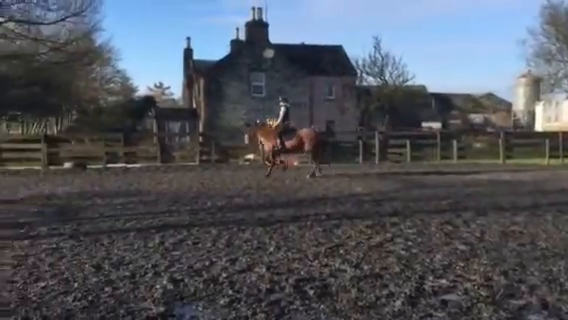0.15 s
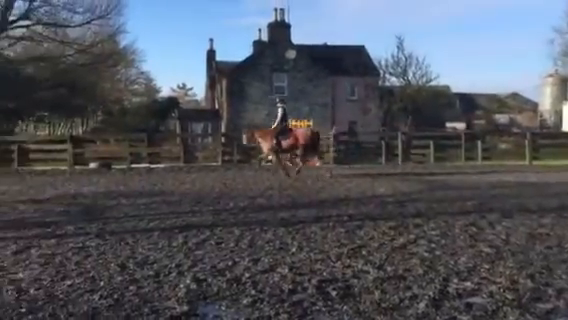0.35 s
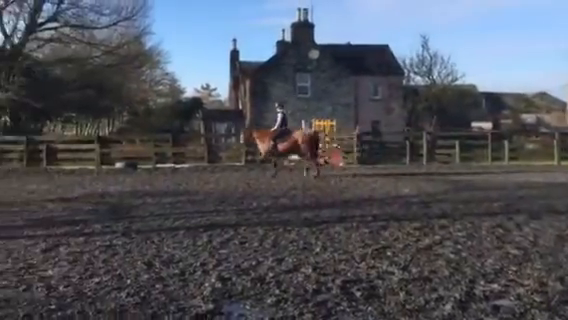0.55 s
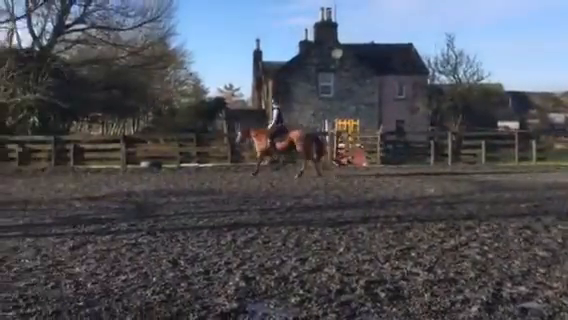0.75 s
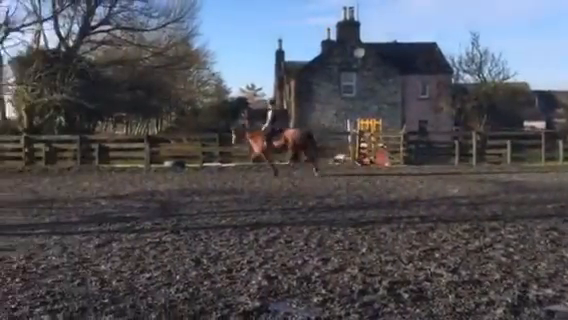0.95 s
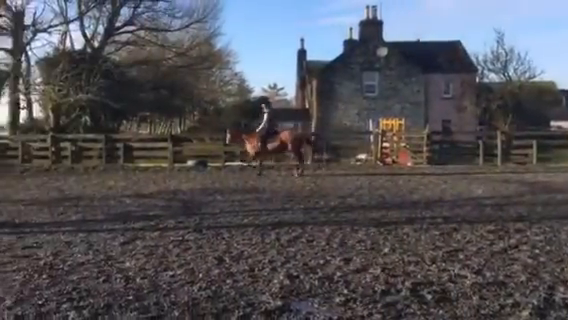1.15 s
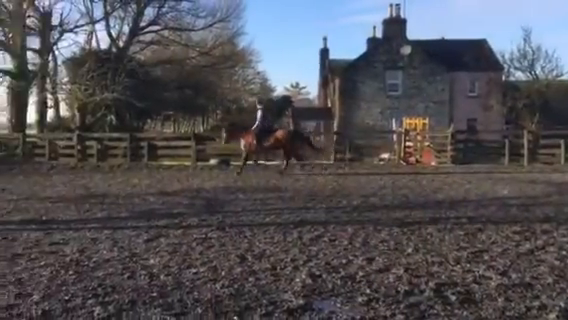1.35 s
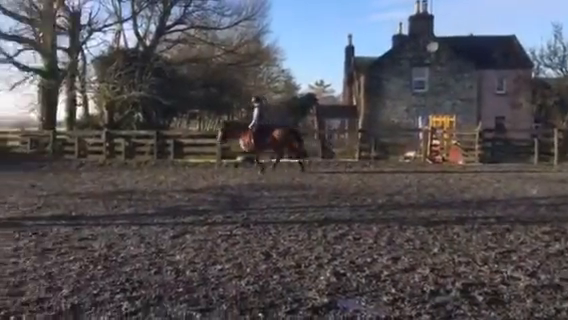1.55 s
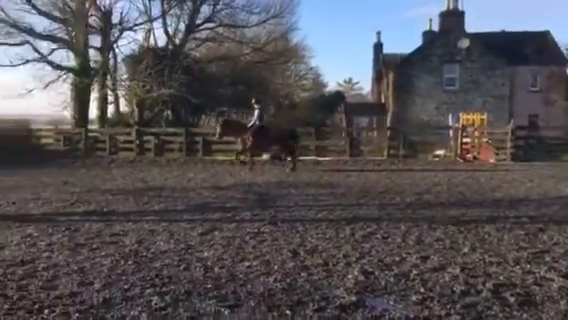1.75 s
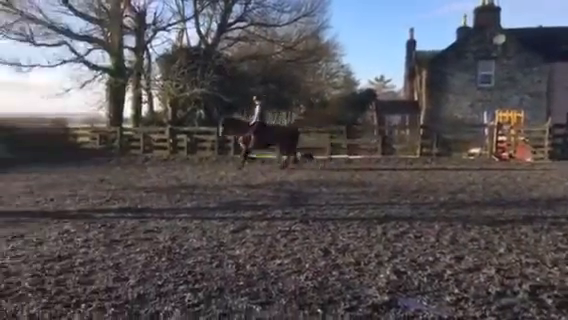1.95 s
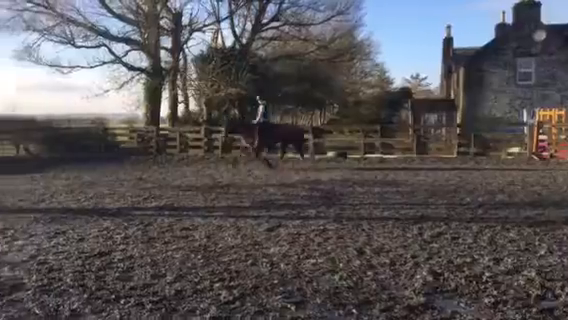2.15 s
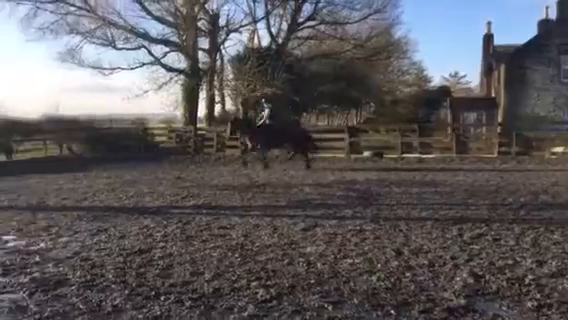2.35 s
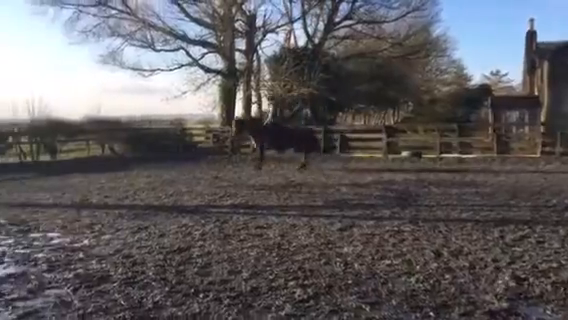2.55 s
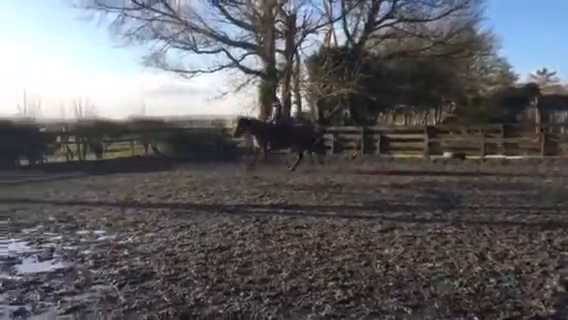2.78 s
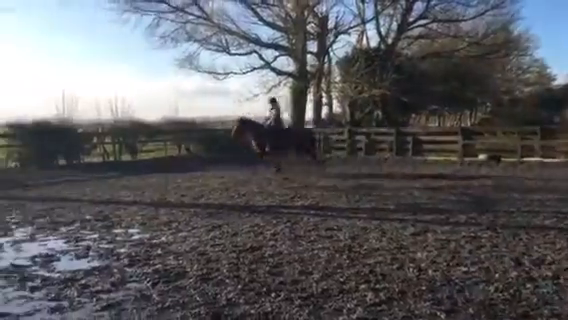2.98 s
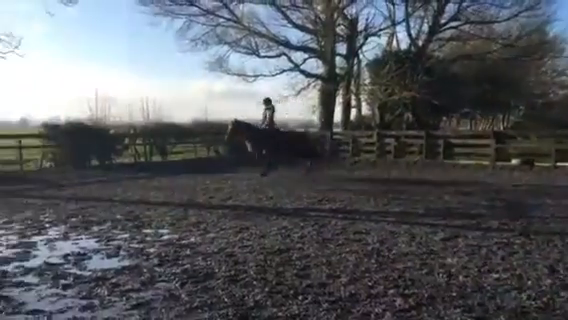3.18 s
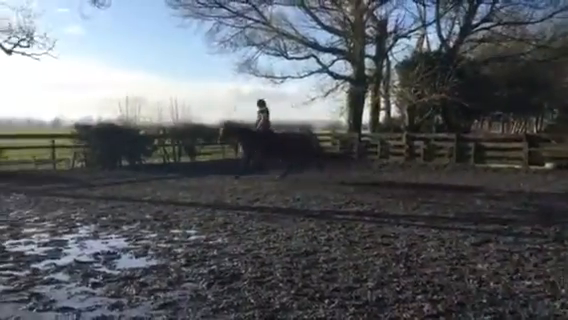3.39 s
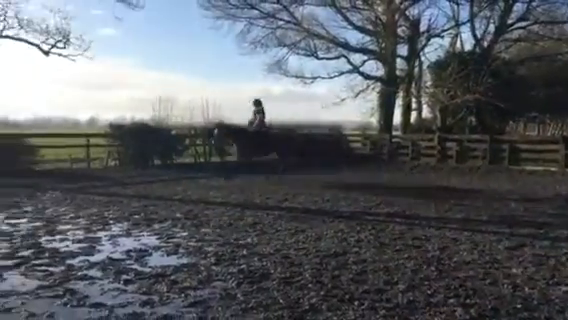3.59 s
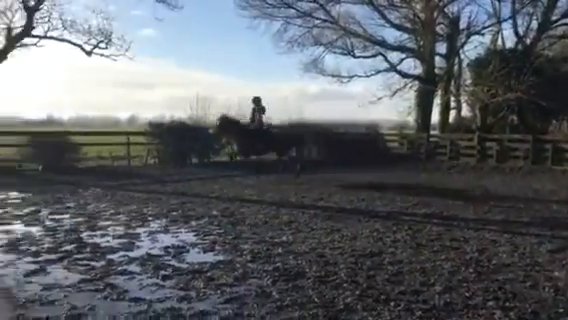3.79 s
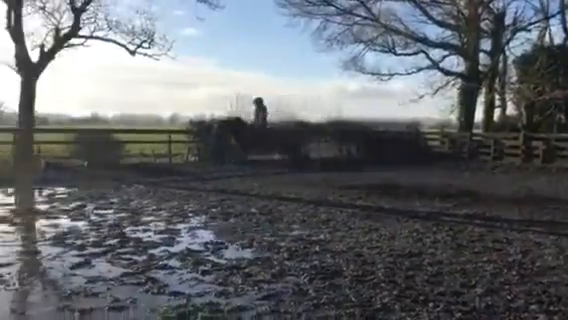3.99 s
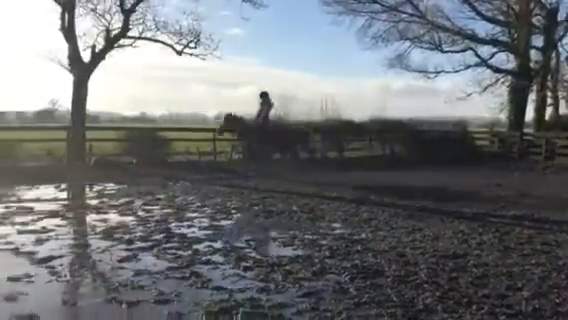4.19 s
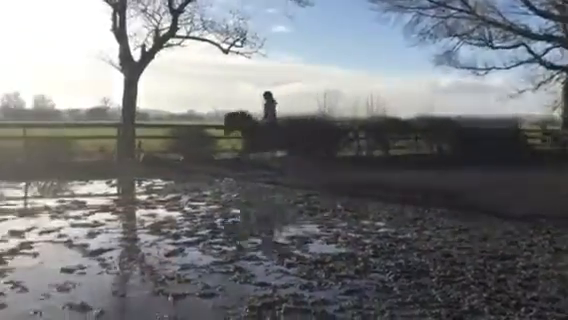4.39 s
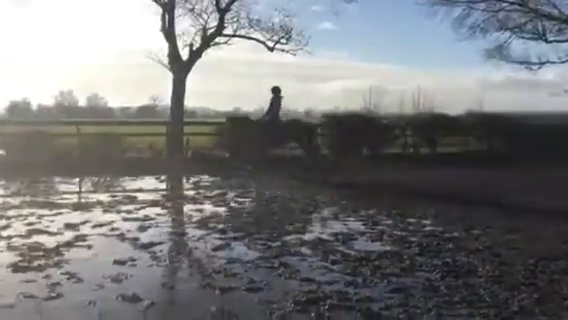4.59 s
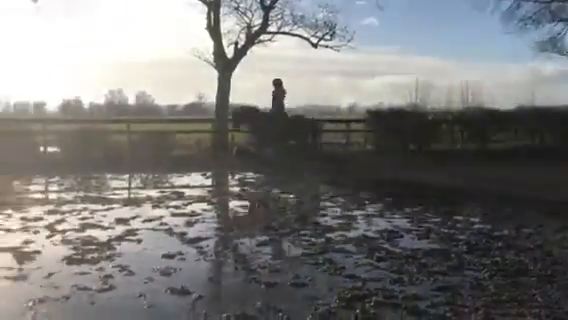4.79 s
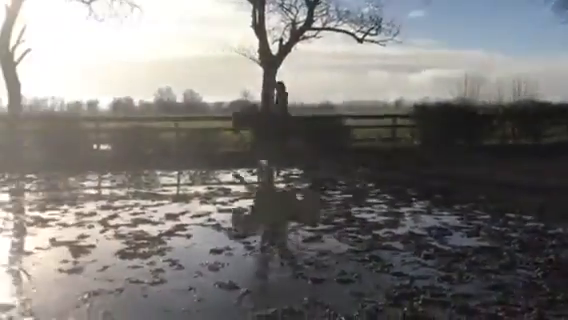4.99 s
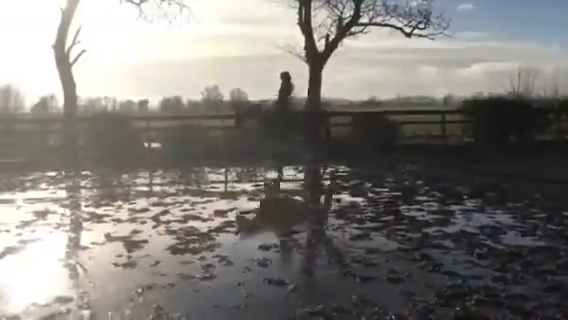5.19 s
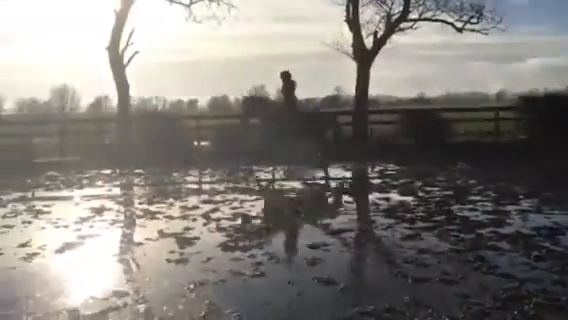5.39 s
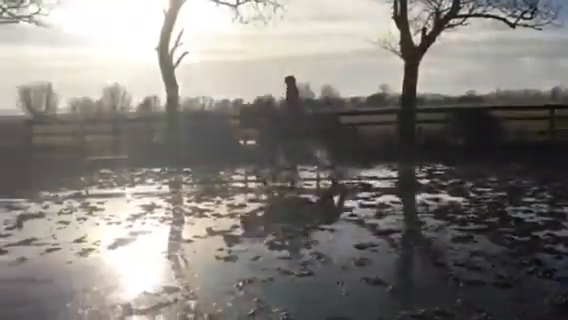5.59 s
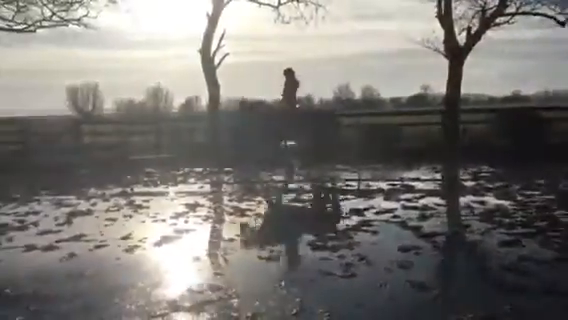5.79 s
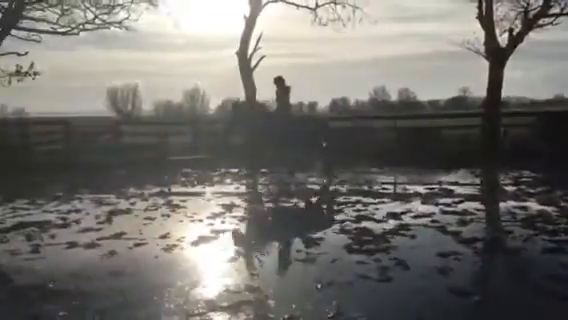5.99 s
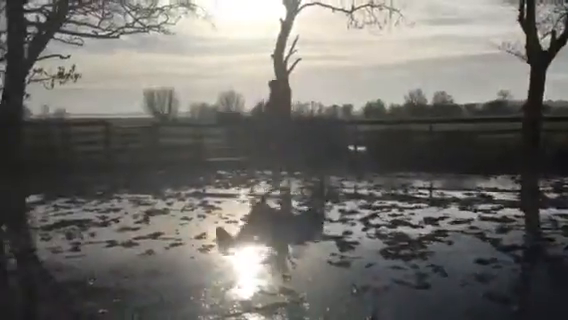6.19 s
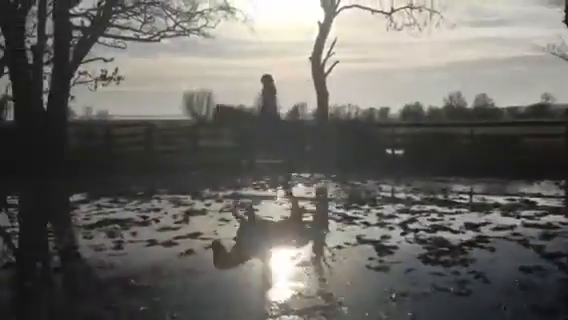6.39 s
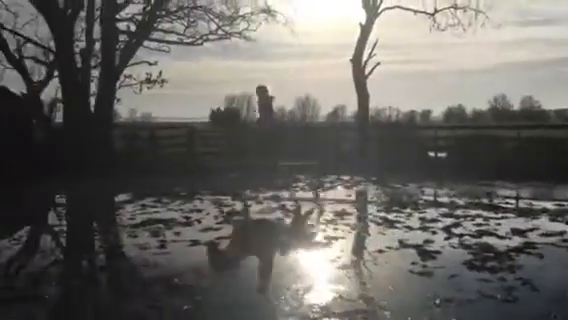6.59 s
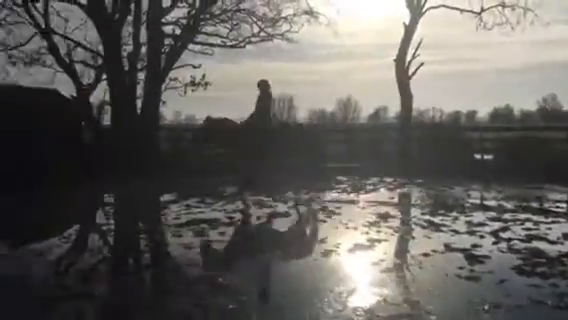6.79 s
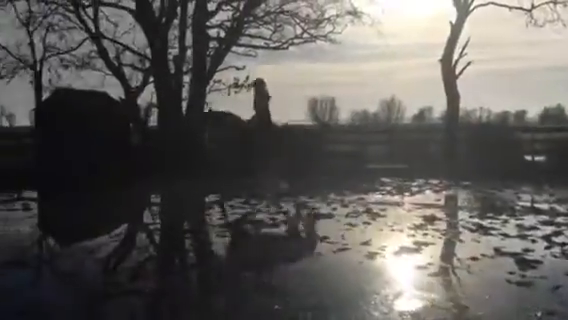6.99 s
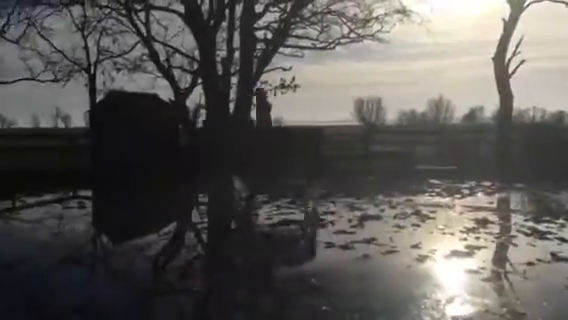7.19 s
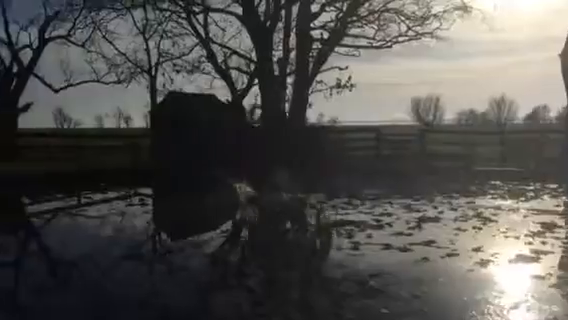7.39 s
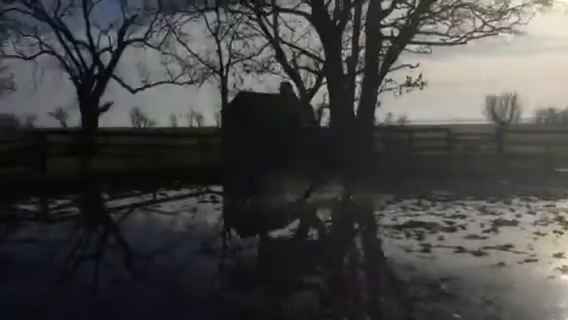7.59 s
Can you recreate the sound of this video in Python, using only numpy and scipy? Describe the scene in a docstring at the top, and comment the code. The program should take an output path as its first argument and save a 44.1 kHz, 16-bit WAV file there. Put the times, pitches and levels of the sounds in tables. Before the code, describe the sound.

A horse canters in an arc over wet ground, starting far away and barely audible above soft air and rumble. After a distant boom and sparse bird calls, mud squelches become clearer, with sharp spits of water and brief faint tack buzzes. From about five seconds hooves knock loudly, mud pockets smack and water sprays, peaking in close, heavy thuds just after seven seconds. Open-air, slightly dull echoes, small microphone.

```python
"""A faint rumble lies under everything; soft squelches, hoarse bird calls and one dull boom come early.
Thin whistles follow, as a horse canters round a waterlogged arena, from the far mud into puddles close by.
Each hoof shuts an air pocket with a thud that falls in pitch; mud is filtered random clicks and ringing bubbles.
Spray is a fizz of fine clicks that patters back down, with sharp spits and pitched drops of water.
Metal tack buzzes now and then; the surroundings add dull echoes to hooves and mud."""
import sys
import numpy as np
from scipy import signal
from scipy.fft import rfft, irfft, next_fast_len
from scipy.io import wavfile

SR = 44100
rng = np.random.default_rng(int(sys.argv[2]) if len(sys.argv) > 2 else 0)


def master_out(mix):
    """Clip the mix to full scale and print it as 16-bit PCM to the path in sys.argv[1]."""
    frames = np.transpose(np.atleast_2d(mix))
    ceiling = np.clip(frames, -1, 1)
    pcm = np.round(ceiling * 32767).astype(np.int16)
    wavfile.write(sys.argv[1], SR, pcm)


N = 337365
TIME = np.arange(N) / SR

# churned water that keeps stirring as the horse comes near: (time [s], relative level [dB])
WASH = [(0, -69.5), (1.2, -69.5), (2.9, -65.5), (4.3, -65), (5.2, -60.5), (6.2, -60), (6.9, -64.5),
        (7.65, -56)]
# a hoof lands, thuds and throws a splash; levels are relative within each layer, swell counts to the thud's crest:
# (time [s], thud level [dB], starting pitch [Hz], swell [cycles at starting pitch],
#  squelch level [dB], spray level [dB], bubble pitch [Hz])
STRIKES = [(0.158, -51.5, 360, 1.6, -55, -63, 1200), (0.2055, -50.5, 346, 2.1, -55, -50.5, 1530),
           (1.1811, -36, 650, 0.91, -65, -67, 1240), (1.4675, -48, 533, 1.7, -63, -71, 870),
           (2.041, -45, 335, 1.2, -59, -62, 1250), (3.176, -43.5, 374, 1.4, -50.5, -52, 1100),
           (3.501, -34, 990, 3.5, -60, -57, 965), (3.532, -45.5, 770, 3.4, -88, -74, 1250),
           (3.719, -40, 516, 1.3, -55.5, -52, 1170), (4.0354, -36.0, 760, 1.1, -55, -73, 1910),
           (4.1732, -47, 340, 1.9, -51.5, -55, 810), (4.3594, -38.5, 1790, 1.8, -74, -56, 1590),
           (4.5089, -31.5, 2200, 2.6, -45, -49.5, 1560), (4.6439, -34, 686, 1.33, -43, -52, 1530),
           (5.0127, -19.5, 1807, 1.97, -34, -44.5, 870), (5.1531, -29, 584, 1.02, -39, -46, 3080),
           (5.5447, -20, 2150, 1.23, -37.5, -37, 1540), (5.5732, -22, 460, 1.13, -36.5, -53, 1220),
           (5.695, -34, 456, 1.05, -41, -49, 1830), (6.0836, -37, 530, 1.3, -41, -37, 3730),
           (6.119, -30.5, 570, 0.98, -36.5, -42.5, 1820), (6.231, -32.5, 400, 1, -39, -44, 3100),
           (6.633, -35, 496, 0.64, -41, -41.5, 1600), (6.8094, -34, 1644, 0.78, -45, -51, 1630),
           (7.1723, -16.5, 480, 0.67, -40, -41, 820), (7.177, -13, 1020, 0.47, -33.5, -50, 1820),
           (7.3695, -15.5, 640, 0.85, -34, -41, 1930), (7.5745, -40, 1660, 2.7, -33.5, -38.5, 2330)]


def from_db(db):
    """Amplitude ratio of a level: 20 dB for each factor of ten."""
    return 10 ** (np.asarray(db) / 20)


def rms_one(x):
    """Normalises the mean power to one."""
    return x / np.sqrt(np.mean(x ** 2) + 1e-20)


def at_hz(points, hz):
    """Interpolates a spectrum in dB along logarithmic frequency."""
    points = np.array(points)
    return np.interp(np.log(hz), np.log(points[:, 0]), points[:, 1])


def band(x, low_hz, high_hz):
    """Band-pass filtering by a Butterworth response."""
    sos = signal.butter(2, [low_hz, min(high_hz, .45 * SR)], "band", fs=SR, output="sos")
    return signal.sosfilt(sos, x + 1e-18)


def bell(x, hz, db, q):
    """Resonance: adding a scaled narrow band lifts or lowers it."""
    return x + (from_db(db) - 1) * signal.lfilter(*signal.iirpeak(hz, max(q, .5), fs=SR), x)


def noise():
    """White noise: equal mean power at every frequency."""
    return rng.standard_normal(N)


def steady_noise(colour):
    """Spectral shaping of white noise to the given colour, with rms 1."""
    size = next_fast_len(N)
    hz = np.maximum(np.fft.rfftfreq(size, 1 / SR), 1)
    gain = from_db(at_hz(colour, hz)) * np.minimum(hz / colour[0][0], 1)
    return rms_one(irfft(rfft(rng.standard_normal(size)) * gain, size)[:N])


def drops(per_s, spread_db):
    """Shot noise: independent random clicks of uneven size and either sign, with rms 1."""
    chance = rng.random(N)
    at = np.flatnonzero(chance < per_s / SR)
    rarity = -np.log(chance[at] * SR / per_s + 1e-9)
    signs = 2 * rng.integers(0, 2, len(at)) - 1
    clicks = np.zeros(N)
    clicks[at] = from_db(spread_db * np.minimum(rarity, 4)) * signs
    return rms_one(clicks)


def sputter(rate_hz, depth_db):
    """Random amplitude modulation: low-passed noise gives uneven surges, a gain of rms 1."""
    steps = TIME[::20]
    keep = np.exp(-2 * np.pi * rate_hz * steps[1])
    gushes = rms_one(signal.lfilter([1], [1, -2 * keep, keep * keep], rng.standard_normal(len(steps))))
    return np.interp(TIME, steps, rms_one(from_db(depth_db * np.clip(gushes, -2, 2))))


def bank(colour, excite):
    """Third-octave filtering: bands with separate calls of excite, together of rms 1: (centres, bands)."""
    edges = 22 * 2 ** (np.arange(30) / 3)
    edges = edges[edges > colour[0][0] * .7]
    centres = np.sqrt(edges[1:] * edges[:-1])
    bands = np.array([from_db(at_hz(colour, hz)) * band(excite(), low, high)
                      for hz, low, high in zip(centres, edges, edges[1:])])
    return centres, bands / np.sqrt(np.mean(bands.sum(axis=0) ** 2))


def burst(s, rise, decay, patter_db, patter_s):
    """Two-stage decay: a splash swells, collapses and leaves falling drops: (samples, envelope)."""
    span = slice(max(0, int((s - .1) * SR)), min(N, int((s + .4) * SR)))
    age = TIME[span] - s
    after = np.maximum(age, 0)
    collapse = np.exp(-after / max(decay, .001))
    patter = from_db(patter_db) * np.exp(-after / patter_s)
    swell = np.exp(-(np.minimum(age, 0) / max(rise, .0005)) ** 2)
    return span, np.hypot(collapse, patter) * swell


def rising_note(hz, age, life, glide):
    """Frequency modulation: the phase runs ahead as the note ages, so the pitch rises."""
    return np.sin(2 * np.pi * hz * age * (1 + glide * np.minimum(life, 2)))


def wash_level(times):
    """Linear interpolation in dB of the churned water's relative level."""
    return np.interp(times, *np.transpose(WASH))


def air():
    """Broadband ambience: steady coloured noise of the open air."""
    # spectrum of the air: (frequency [Hz], relative spectral level [dB])
    air_colour = [(30, -37), (60, 6), (110, 0), (200, -6.5), (400, -14), (700, -22), (1000, -19.5),
                  (2000, -29.5), (3300, -34.5), (5000, -49), (9000, -51), (11000, -71), (16000, -41)]
    return from_db(-57) * steady_noise(air_colour)


def rumble():
    """Low-frequency ambience: coloured noise wanders in level about one mean."""
    # spectrum of the rumble: (frequency [Hz], relative spectral level [dB])
    rumble_colour = [(25, 7), (40, -2), (55, 8), (80, -16), (100, 10.5), (130, -24.5), (250, -17.5),
                     (600, -62)]
    return from_db(-57) * sputter(rate_hz=5, depth_db=5.5) * steady_noise(rumble_colour)


def boom(s, start_hz, hz, db, decay, tail_db, roll_db):
    """Decaying oscillation: one dull, distant boom sinks in pitch, with a low tail and a fluttering roll."""
    tail_decay_s = .1
    age = np.maximum(TIME - s, 0)
    pitch = hz + (start_hz - hz) * np.exp(-age / 0.0097)
    phase = 2 * np.pi * np.cumsum(pitch * (age > 0)) / SR
    note = np.exp(-(age / decay) ** 2) * np.sin(phase)
    fade = np.exp(-age / tail_decay_s)
    tail = rms_one(band(noise(), 66, 120)) * fade
    roll = rms_one(band(noise(), 170, 340)) * sputter(rate_hz=45, depth_db=4) * fade
    onset = 1 - np.exp(-age / 0.0011)
    return onset * (from_db(db) * note + from_db(tail_db) * tail + from_db(roll_db) * roll)


def birds():
    """Frequency-swept tones make thin, wavering whistles; narrow noise bands make hoarse calls."""
    # thin whistles: (time [s], length [s], start pitch [Hz], end pitch [Hz], level [dB])
    whistles = [(3.592, 0.036, 4330, 6100, -63), (3.797, 0.053, 4400, 4830, -61),
                (3.893, .05, 6000, 6450, -59), (3.819, 0.13, 2260, 3400, -62),
                (4.073, 0.042, 3820, 3700, -58), (4.363, 0.032, 4030, 4600, -57),]
    # hoarse far-off calls, blurred by distance, half width taken at half amplitude:
    # (crest time [s], half width [s], pitch [Hz], level [dB], octave above re pitch band [dB])
    far_calls = [(0.066, 0.018, 1800, -65, -4), (0.548, 0.033, 660, -62.5, -20),
                 (1.395, 0.022, 2270, -67.5, -10), (1.74, .016, 2650, -63, -12),
                 (1.833, 0.13, 695, -68, -20), (3.394, .025, 3460, -70, -20),
                 (3.585, 0.011, 1350, -63, -20), (4.232, 0.036, 650, -58, -15)]
    out = np.zeros(N)
    waver, flutter = sputter(rate_hz=50, depth_db=.05), sputter(rate_hz=50, depth_db=2.0)
    for s, length, start_hz, end_hz, db in whistles:
        progress = np.clip((TIME - s) / length, 0, 1)
        pitch = (start_hz + (end_hz - start_hz) * progress) * waver
        tone = np.sin(2 * np.pi * np.cumsum(pitch) / SR)
        out += from_db(db) * flutter * np.sin(np.pi * progress) * tone
    for s, half, hz, db, octave_db in far_calls:
        span = np.abs(TIME - s) < 2 * half
        count = span.sum()
        low, high = (rms_one(band(rng.standard_normal(count), 0.87 * k * hz, 1.13 * k * hz)) for k in (1, 2))
        out[span] += from_db(db) * np.hanning(count) * (low + from_db(octave_db) * high)
    return out


def buckle(width_hz):
    """Modal resonance: chattering metal parts of the tack ring at a few high pitches."""
    # ringing modes of the metal: (frequency before pitch share [Hz], relative level [dB])
    buckle_modes = [(3350, 1.5), (5550, -4), (8800, 2), (9500, -4)]
    # each buzz: (time [s], relative level [dB], pitch as a share of the modes [1])
    buzzes = [(2.181, -59, .84), (3.106, -62, 0.92), (7.311, -54, 0.94)]
    buzz_spread_s = 0.0097
    out = np.zeros(N)
    for s, level_db, share in buzzes:
        span = np.abs(TIME - s) < .1
        swell = np.exp(-.5 * ((TIME[span] - s) / buzz_spread_s) ** 2)
        chatter = drops(per_s=1500, spread_db=1.0)[span] * swell
        for hz, db in buckle_modes:
            ring = band(chatter, share * hz - width_hz / 2, share * hz + width_hz / 2)
            out[span] += from_db(level_db + db) * ring
    return np.sqrt(SR / 2 / width_hz) * out  # makes up for the power lost to the narrow bands


def crumbs(level_db):
    """Sparse impacts: loose crumbs of mud keep settling with small knocks."""
    # filter on the knocks: (frequency [Hz], relative gain [dB])
    crumb_colour = [(400, 3.5), (1500, 2), (4000, -11.5), (9000, -24)]
    centres, bands = bank(crumb_colour, lambda: drops(per_s=22, spread_db=2.5))
    return from_db(wash_level(TIME) + level_db) * bands.sum(axis=0)


def splashes():
    """Each landing or splash between thuds is a source of mud and water: rows for the splash layers.

    Rows are (time [s], squelch level [dB], spray level [dB], bubble pitch [Hz], rise [s], decay [s])."""
    # squelches and splashes between the thuds: toes skimming in, hooves pulling free, clods landing;
    # (crest time [s], relative squelch level [dB], relative spray level [dB], bubble pitch [Hz], decay [s])
    between_table = [(0.297, -51.5, -49, 3750, 0.0093), (0.538, -54.5, -52.5, 2220, 0.023),
                     (0.829, -53, -52, 1930, 0.041), (0.944, -50, -49.5, 955, 0.0077),
                     (1.165, -54.5, -54.5, 1610, 0.024), (1.451, -51.5, -51, 1020, 0.022),
                     (1.551, -47, -49, 5300, 0.014), (1.703, -53, -55, 1270, 0.1),
                     (2.026, -58, -51.5, 1630, 0.037), (2.152, -60.5, -56, 2580, 0.045),
                     (2.329, -53.5, -57, 1240, 0.032), (2.6, -54, -57.5, 910, 0.055),
                     (2.872, -54.5, -50.5, 1830, 0.047), (3.306, -59, -58, 1170, 0.0075),
                     (3.339, -58, -64, 1280, 0.054), (3.473, -52, -53.5, 1030, 0.012),
                     (3.69, -48.5, -52, 3450, 0.01), (3.777, -48, -43.5, 1340, 0.012),
                     (3.944, -46, -54, 1390, 0.045), (4.356, -49.5, -51, 1085, 0.026),
                     (4.493, -50, -54, 940, 0.025), (4.696, -45, -56.5, 1840, 0.032),
                     (4.826, -43.5, -46, 1390, 0.013), (4.891, -42, -41, 3120, 0.014),
                     (5.204, -45, -49, 2860, 0.016), (5.35, -46.5, -51, 2130, 0.011),
                     (5.428, -37.5, -46, 2430, 0.032), (5.561, -50, -51, 1450, 0.0078),
                     (5.687, -40.5, -38, 2410, 0.0085), (5.749, -44, -48, 1410, 0.017),
                     (5.891, -44.5, -46.5, 950, 0.0077), (5.971, -37, -43.5, 3200, 0.011),
                     (5.996, -46.5, -54, 1710, 0.03), (6.29, -42.5, -44.5, 1010, 0.012),
                     (6.44, -45, -51, 1580, 0.012), (6.515, -38.5, -41, 3300, 0.02),
                     (6.661, -36, -53, 1590, 0.014), (6.801, -39, -56, 1600, 0.017),
                     (6.85, -46, -54, 1280, 0.026), (7.008, -44.5, -66, 1620, 0.014),
                     (7.029, -43.5, -55, 1200, 0.024), (7.066, -45, -44, 2430, 0.016),
                     (7.084, -45.5, -36, 2760, 0.011), (7.222, -44, -70, 580, 0.013),
                     (7.243, -49.5, -63, 2800, 0.018), (7.418, -49, -47, 970, 0.042),
                     (7.634, -77, -44.5, 2260, 0.058)]
    rise_cycles, landing_decay_s = 3.6, .024  # a landing rises over cycles of its thud's starting pitch
    rise_share, rise_max_s = 0.54, 0.013  # the others rise for a share of their decay, up to a limit
    landings = [(s, db, spray_db, bubble_hz, rise_cycles / hz, landing_decay_s)
                for s, thud_db, hz, swell_cycles, db, spray_db, bubble_hz in STRIKES]
    between = [(s, db, spray_db, hz, min(rise_share * decay, rise_max_s), decay)
               for s, db, spray_db, hz, decay in between_table]
    return np.array(landings + between)


def stray_drops():
    """Poisson arrivals: flung drops land at random, louder where water is churned.

    Rows are (time [s], relative peak level [dB], decay [s])."""
    per_s, over_wash_db, decay_s = 5.0, 4, 0.0012
    times = TIME[rng.random(N) < per_s / SR]
    return [(s, db, decay_s) for s, db in zip(times, wash_level(times) + over_wash_db)]


def spits(level_db):
    """Transient noise: each sharp spit of water is a bright crack a few milliseconds long."""
    # a toe meets a puddle or a flung drop lands: (time [s], relative peak level [dB], decay [s])
    spit_table = [(1.5435, -33, 0.0045), (2.136, -32, 0.0019), (2.145, -29, .003), (2.1584, -36, 0.0025),
                  (2.299, -31.5, 0.0045), (2.701, -36, 0.0027), (2.728, -28.5, 0.0039),
                  (3.2943, -28, 0.005), (4.2694, -23.5, 0.0029), (4.394, -26.5, 0.0032),
                  (4.638, -27, 0.0037), (4.771, -22.5, 0.0043), (5.0131, -10.5, 0.0011),
                  (5.1373, -23, 0.0063), (5.290, -25, 0.005), (5.369, -28, 0.0048), (5.9677, -22, 0.0038),
                  (6.082, -44, .0034), (6.3504, -24.5, 0.0061), (6.387, -25, 0.0018), (6.5, -28, 0.0037),
                  (6.631, -28, .003), (6.945, -30.5, .003), (7.173, -13.5, 0.0038), (7.3575, -22, 0.0039),
                  (7.363, -18.5, 0.0036), (7.5306, -27, 0.012), (7.552, -27.5, 0.0092),
                  (7.5627, -19, 0.0051)]
    envelope = np.zeros(N)
    for s, db, decay in [*spit_table, *stray_drops()]:
        span = slice(int(s * SR), int((s + .05) * SR))
        envelope[span] += from_db(db + level_db) * np.exp(-(TIME[span] - s) / decay)
    return band(envelope * drops(per_s=14000, spread_db=0.5), 3250, 12400)


def droplets(thrown, level_db, fall_s, decay, count):
    """Damped oscillation: thrown water comes down as separate ticks, each at its own pitch."""
    low_hz, high_hz = 1290, 6680
    out, age = np.zeros(N + SR), TIME[:SR // 100]
    for s, db, spray_db, hz, rise, splash_decay in thrown:
        for wait, size, height in zip(rng.exponential(1, count), rng.random(count), rng.random(count)):
            pitch = low_hz * (high_hz / low_hz) ** height
            tick = np.sin(2 * np.pi * pitch * age) * np.exp(-age / decay)
            at = int((s + min(wait, 4) * (splash_decay + fall_s)) * SR)
            out[at:at + len(age)] += from_db(db + level_db - 5 * wait) * size * tick
    return out[:N]


def spray(thrown, level_db, wash_db, crackle):
    """Summed droplet impacts: a fine fizz with sharp clicks that span the whole treble."""
    # filter on the droplets: (frequency [Hz], relative gain [dB])
    spray_colour = [(1500, -30), (3500, -1.5), (5000, 6.5), (6500, 1.5), (8000, 5), (10000, 3), (12500, 0),
                    (16000, -14)]
    clicks = drops(per_s=2200, spread_db=29.0)
    centres, bands = bank(spray_colour, lambda: drops(per_s=5400, spread_db=4.0) + crackle * clicks)
    power = from_db(wash_level(TIME) + wash_db) ** 2
    for s, db, spray_db, hz, rise, decay in thrown:
        span, envelope = burst(s, rise, decay, patter_db=-19.5, patter_s=0.53)
        power[span] += (from_db(spray_db + level_db) * envelope) ** 2
    return np.sqrt(power) * bands.sum(axis=0)


def bubbles(thrown, level_db, cycles, glide, spread_octaves, count):
    """Bubble resonance: larger bubbles ring and rise in pitch as they surface; late ones are fainter."""
    out, age = np.zeros(N + SR), TIME[:SR // 40]
    for s, db, spray_db, hz, rise, decay in thrown:
        for wait, size, chance in zip(rng.exponential(1, count), rng.normal(0, 1, count), rng.random(count)):
            pitch = min(hz * 2 ** (spread_octaves * size), 9000)
            life = age * pitch / cycles
            note = rising_note(pitch, age, life, glide) * np.exp(-np.log(1000) * life)  # -60 dB at life 1
            at = int((s + wait * (decay + .008)) * SR)
            out[at:at + len(age)] += from_db(db + level_db - 5 * wait) * chance * note
    return out[:N]


def smacks(level_db, cycles, glide, crack_db):
    """Impulsive cavity resonance: each pocket opens with a tiny crack and a short ring rising in pitch."""
    # mud pockets smack open and flung clods land: (time [s], relative level [dB], pitch [Hz])
    smack_table = [(1.544, -30, 5350), (1.699, -44, 990), (2.084, -36.5, 1270), (2.136, -42, 1380),
                   (2.718, -34.5, 3680), (3.312, -35, 1140), (3.3342, -34, 1520), (3.4241, -39, 1070),
                   (3.689, -28.5, 3350), (3.991, -25, 1710), (4.038, -30.5, 2200), (4.178, -35.5, 840),
                   (4.638, -37, 990), (4.698, -28, 3450), (4.8252, -32, 2030), (4.844, -27, 6000),
                   (4.979, -33, 1480), (5.348, -36, 2020), (5.424, -28, 3720), (5.5615, -21, 1730),
                   (5.581, -19.5, 1450), (5.6, -27, 1010), (5.656, -36, 1180), (5.6913, -28, 1970),
                   (5.8893, -40, 960), (5.9687, -20, 3540), (6.0809, -25.5, 850), (6.219, -29.5, 1200),
                   (6.4364, -35, 1880), (6.499, -38, 690), (6.5122, -19, 3800), (6.631, -28, 1260),
                   (6.7983, -30, 964), (7.0063, -29.5, 1050), (7.188, -25, 975), (7.1925, -24, 1910),
                   (7.1948, -16.5, 3650), (7.413, -25, 870), (7.563, -23, 1830), (7.574, -19.5, 3200),
                   (7.589, -27, 2720)]
    out, age = np.zeros(N + SR), TIME[:SR // 40]
    for s, db, hz in smack_table:
        life = age * hz / cycles
        note = rising_note(hz, age, life, glide) * np.exp(-life)
        crack = from_db(crack_db) * rng.standard_normal(len(age)) * np.exp(-age / 0.00073)
        at = int(s * SR)
        out[at:at + len(age)] += from_db(db + level_db) * (note + crack)
    return out[:N]


def squelches(thrown, focus_db, width_octaves, patchy_db, level_db):
    """Cavity resonance: mud bursts into small cavities that crowd round one pitch for each splash."""
    # filter on the mud: (frequency [Hz], relative gain [dB])
    squelch_colour = [(150, 5), (280, 7), (430, -0.5), (650, 3.5), (1050, 3), (1400, -3), (2000, 1.5),
                      (2600, -6), (3600, 2.5), (5000, -8), (7000, -6.5), (15000, -24.5)]
    grain_share = 0.29
    grains = drops(per_s=450, spread_db=3.0)  # coarse grains crackle through all cavities at once

    def cavity():
        """Amplitude-modulated shot noise: one cavity opens and shuts on its own."""
        clicks = drops(per_s=1100, spread_db=1.5) + grain_share * rng.choice([-1, 1]) * grains
        return clicks * sputter(rate_hz=22.0, depth_db=2.5)

    centres, bands = bank(squelch_colour, cavity)
    out = from_db(wash_level(TIME)) * bands.sum(axis=0)
    for s, db, spray_db, hz, rise, decay in thrown:
        span, envelope = burst(s, rise, decay, patter_db=-57, patter_s=0.017)
        nearness = np.exp(-.5 * (np.log2(centres / hz) / width_octaves) ** 2)
        patchy = patchy_db * rng.standard_normal(len(centres))
        gains = from_db(db + level_db + focus_db * (nearness - 1) + patchy)
        out[span] += envelope * (gains @ bands[:, span])
    return out


def slosh(level_db, lag, decay):
    """Low resonance: water runs back into each print after the strike and gurgles at its own pitch."""
    centre_hz, spread_octaves = 290, 0.2
    out, glugs = np.zeros(N), drops(per_s=200, spread_db=-1.0)
    for (s, db, *_), size in zip(STRIKES, rng.uniform(-1, 1, len(STRIKES))):
        span, envelope = burst(s + lag, 0.0023, decay, patter_db=-17.5, patter_s=0.4)
        hz = centre_hz * 2 ** (spread_octaves * size)
        gurgle = rms_one(band(glugs[span], hz / 1.25, hz * 1.25))
        out[span] += from_db(db + level_db) * envelope * gurgle
    return out


def thuds(final_hz, level_db):
    """Damped oscillation: the squeezed air pocket knocks with a falling pitch, and the soft ground gives."""
    ground_hz, ground_decay_s, ground_db = 121, 0.0047, -11.5
    out = np.zeros(N)
    for s, db, hz, swell_cycles, *_ in STRIKES:
        swell = swell_cycles / hz
        span = slice(int(s * SR), int((s + .06) * SR))
        age = np.maximum(TIME[span] - s, 0)
        cycles = final_hz * age + (hz - final_hz) * swell * (1 - np.exp(-age / swell))
        knock = age / swell * np.exp(1 - age / swell) * np.sin(2 * np.pi * cycles)
        give = np.exp(-age / ground_decay_s) * np.sin(2 * np.pi * ground_hz * age)
        out[span] += from_db(db + level_db) * knock + from_db(db + ground_db) * give
    return band(out, 62, 2800)


def low_body(x):
    """Two resonances: hooves and mud are fuller near 250 Hz and thinner near 450 Hz."""
    return bell(bell(x, hz=248, db=2.0, q=2.4), hz=448, db=-4.0, q=6.8)


def outdoors(x, scatter_db, scatter_s):
    """Reflection by convolution: a few dull echoes and a thin scatter from the surroundings."""
    # echoes from fence and trees, before band-passing: (delay [s], gain [dB])
    echoes = [(.063, -22.5), (.094, -26)]
    age = TIME[:SR // 2]
    response = rng.standard_normal(len(age)) * np.exp(-age / scatter_s) * (1 - np.exp(-age / 0.00031))
    response *= from_db(scatter_db) / np.linalg.norm(response)
    for delay, db in echoes:
        response[int(delay * SR)] += from_db(db)
    return x + band(signal.fftconvolve(x, response)[:N], 230, 5800)


def scene():
    """Superposition: hooves, mud and water in the open arena, over air, rumble and far-off sounds."""
    far = boom(s=.610, start_hz=185, hz=95, db=-37, decay=0.042, tail_db=-43, roll_db=-53.5) + birds()
    thrown = splashes()
    water = spray(thrown, level_db=-3.5, wash_db=-4.0, crackle=0.084) * sputter(rate_hz=64, depth_db=2.0)
    water += spits(level_db=-13.5)
    mud = squelches(thrown, focus_db=4.0, width_octaves=0.9, patchy_db=2.5, level_db=-1.5)
    mud *= sputter(rate_hz=80, depth_db=2.5)
    mud += bubbles(thrown, level_db=4.5, cycles=18, glide=0.12, spread_octaves=0.7, count=9)
    mud += droplets(thrown, level_db=11, fall_s=.012, decay=.00045, count=10)
    mud += crumbs(level_db=-4)
    mud += smacks(level_db=-6.5, cycles=2.1, glide=0.011, crack_db=-11.5)
    hooves = thuds(final_hz=129, level_db=0.7) + slosh(level_db=-35.5, lag=0.036, decay=0.045)
    near = outdoors(low_body(hooves + mud), scatter_db=-12.5, scatter_s=0.047)
    return (near + water + buckle(width_hz=700) + air() + rumble() + far)[None]


def record(dry):
    """Transducer response: a small microphone loses deep bass and ripples the treble; the top is cut steeply."""
    # peaks and dips of the microphone: (frequency [Hz], gain [dB], Q [1])
    ripples = [(4910, -5, 11.6), (7800, -3, 6), (9160, 2, 8), (10480, -7.5, 15)]
    cutoff_hz = 16100
    thin = signal.sosfilt(signal.butter(2, 40, "high", fs=SR, output="sos"), dry)
    for hz, db, q in ripples:
        thin = bell(thin, hz, db, q)
    return signal.sosfilt(signal.ellip(10, .2, 80, cutoff_hz, fs=SR, output="sos"), thin)


dry = scene()
out = record(dry)
master_out(out)
```